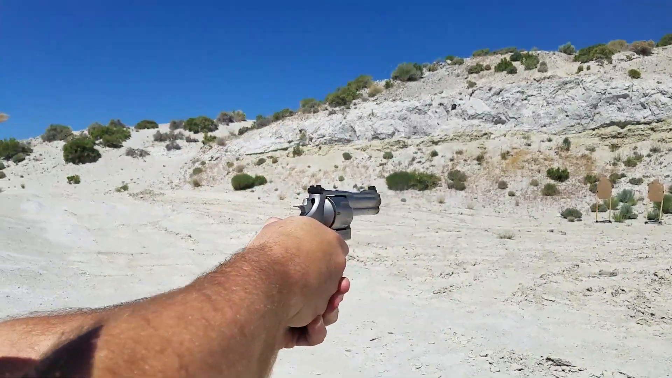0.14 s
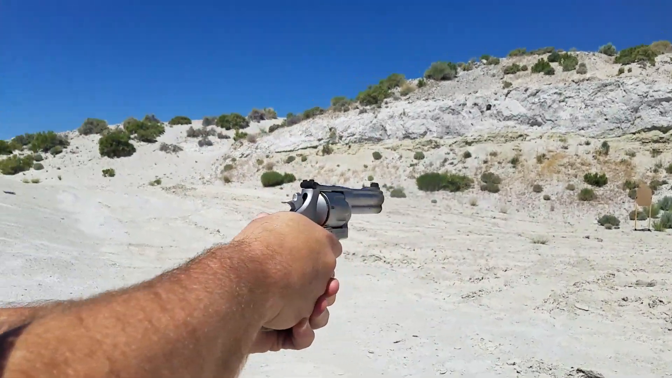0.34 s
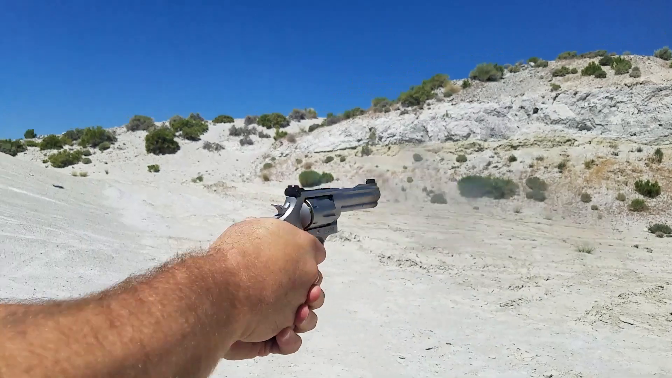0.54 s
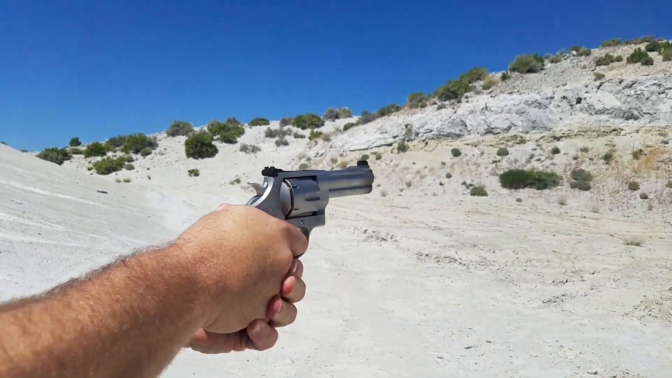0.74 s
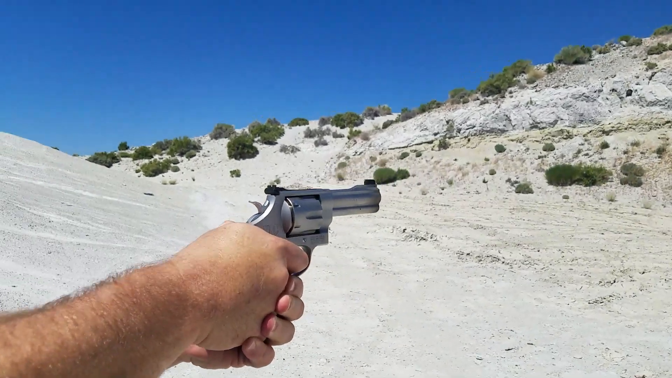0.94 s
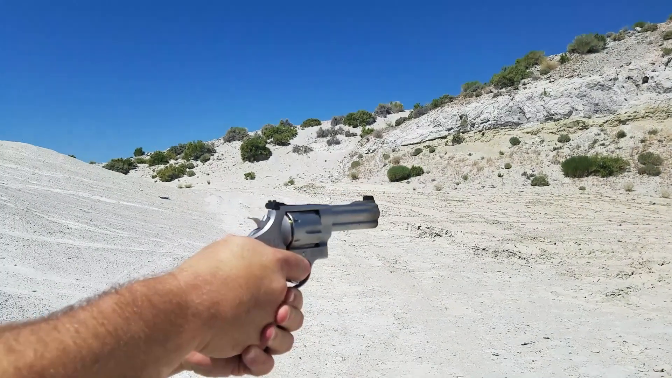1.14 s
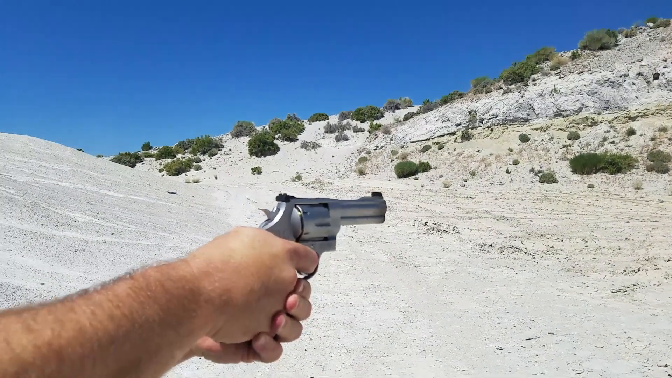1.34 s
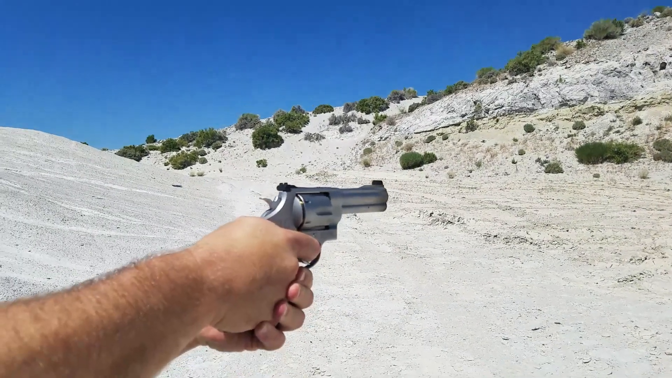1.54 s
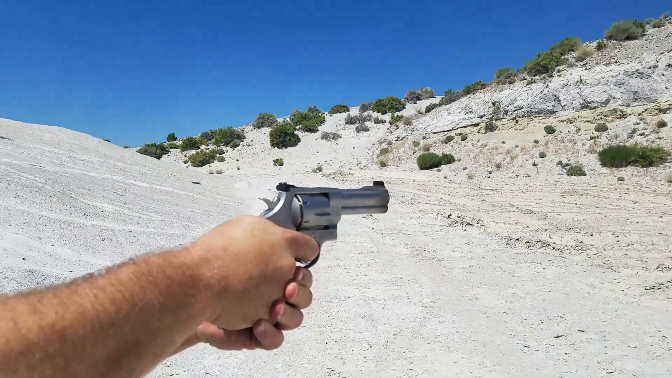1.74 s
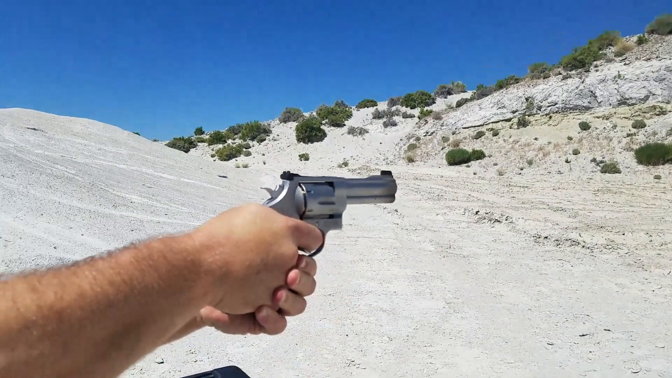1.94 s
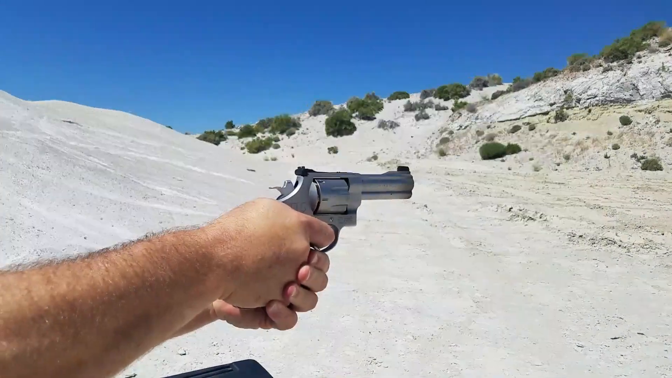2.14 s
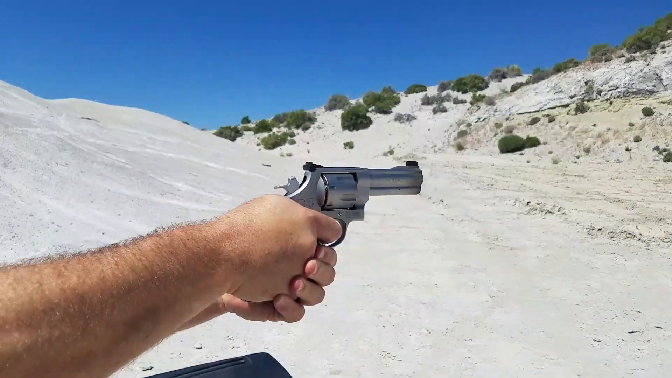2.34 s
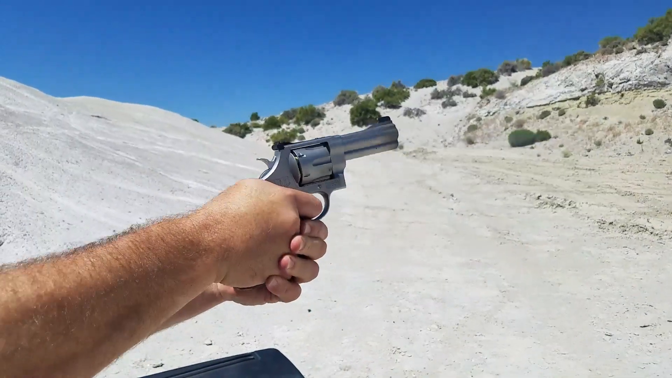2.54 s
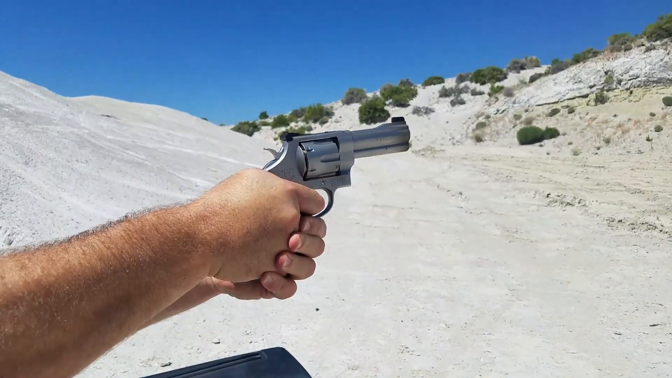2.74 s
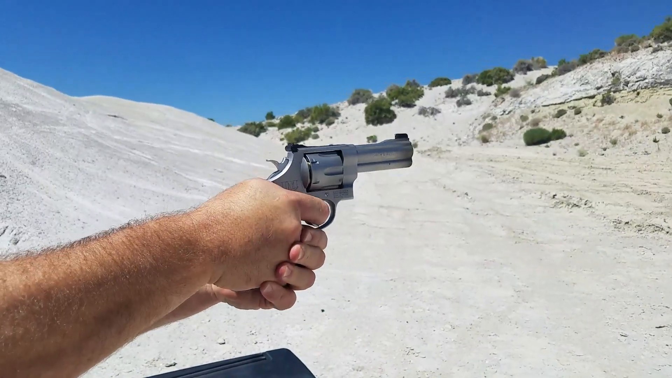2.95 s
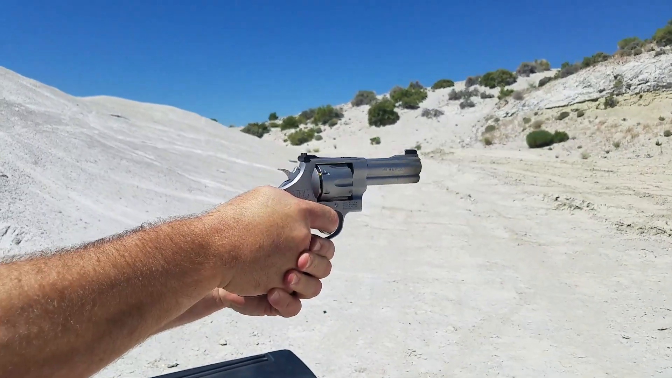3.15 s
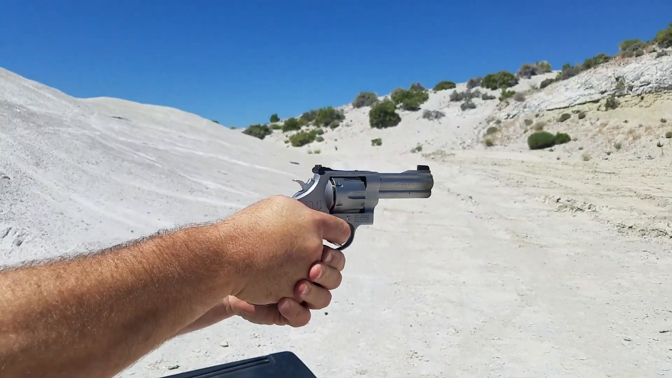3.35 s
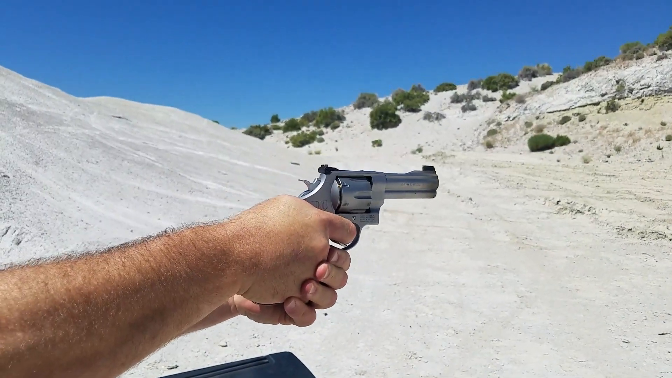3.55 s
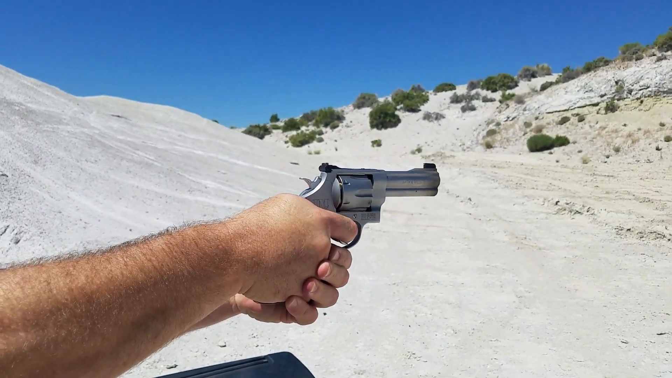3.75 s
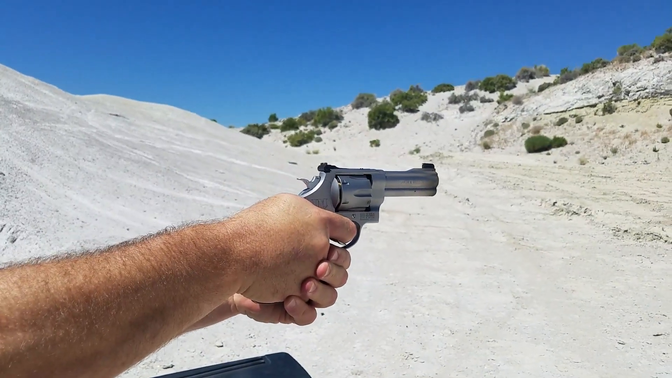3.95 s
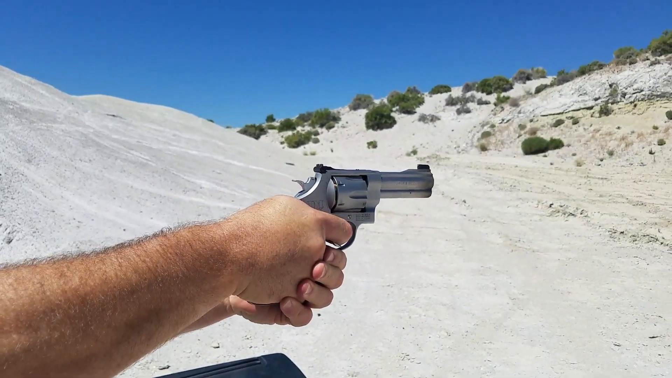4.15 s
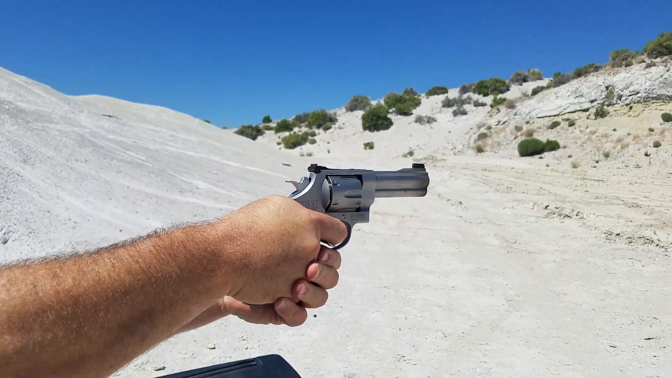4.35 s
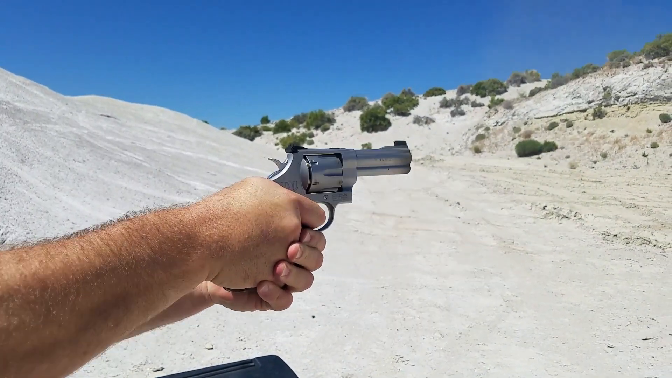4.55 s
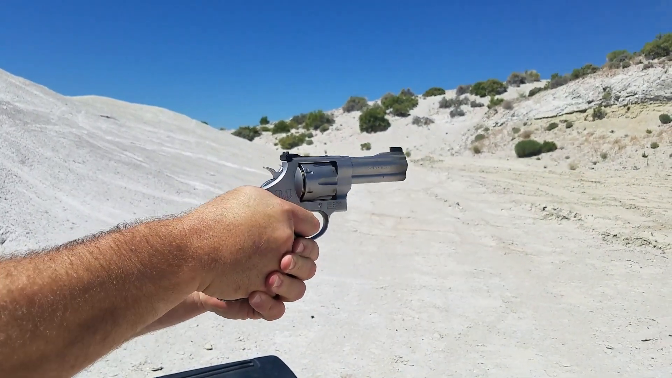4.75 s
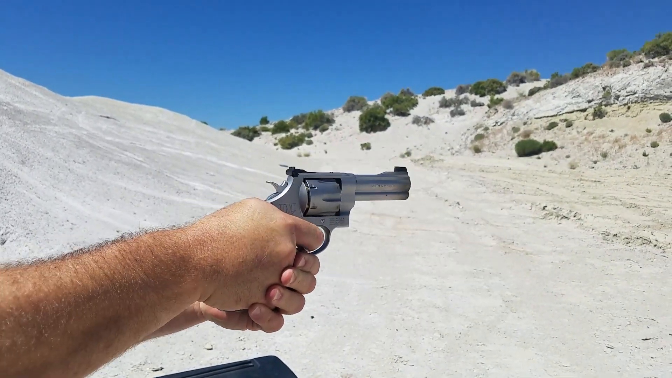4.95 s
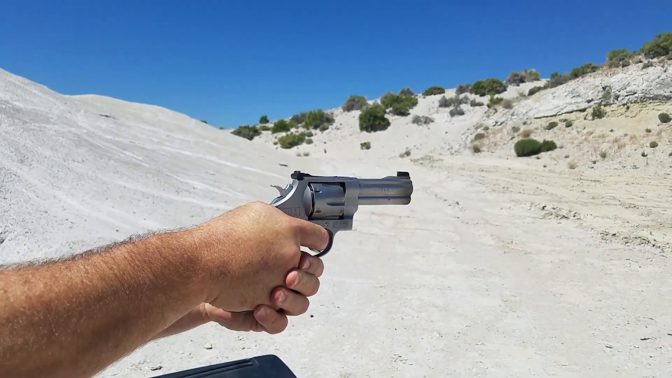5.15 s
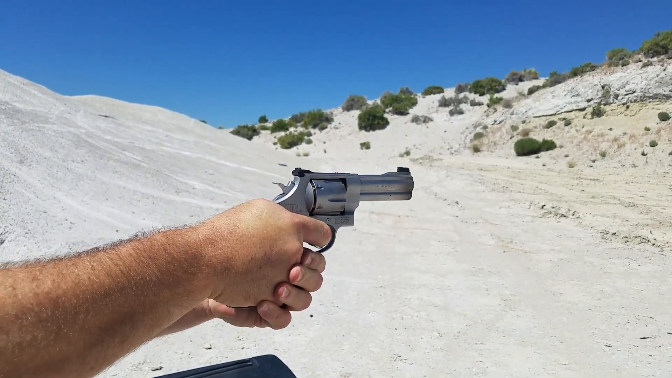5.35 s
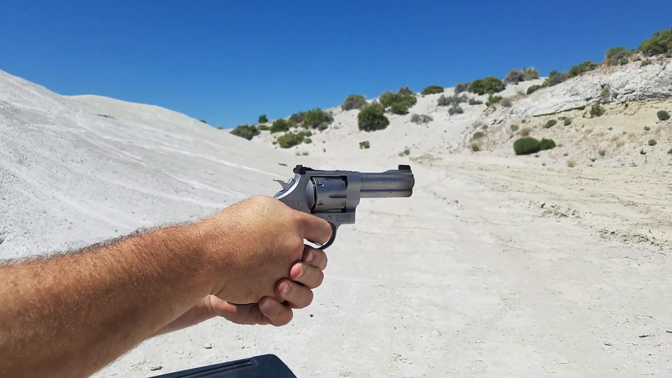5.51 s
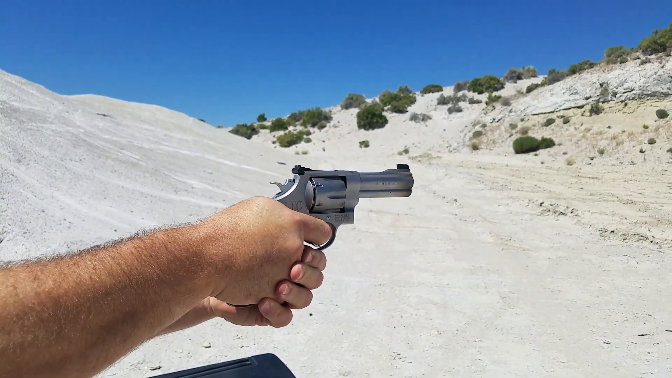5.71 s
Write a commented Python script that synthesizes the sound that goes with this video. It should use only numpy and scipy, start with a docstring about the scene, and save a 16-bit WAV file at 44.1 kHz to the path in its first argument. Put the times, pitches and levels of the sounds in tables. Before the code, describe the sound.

A puff of wind and a click of cocked steel open the scene. A revolver at arm's length fires three times, about two seconds apart, each a harsh clipped crack and roar answered quickly by a slapping hillside echo and fading rumble. Metallic lockwork clicks and faint wind fill the gaps. A small stereo camera close to the gun overloads and ducks.

```python
"""A puff of wind and a click of cocked steel, then three slow revolver shots in a sandy pit, at arm's length.
Blast: shaped noise bursts (crack, roar, late thump, sizzle) plus a wandering sine boom and a ring of steel.
Banks and hillside return smeared noise and sharp slaps; the pit's rumble loses its treble first.
Lockwork: scrapes ringing damped sines. Grip rubs, wind, brush and hiss: noise with moving levels.
A gain control ducks everything after each blast; peaks clip softly in the small camera."""
import sys
import numpy as np
from scipy import signal
from scipy.fft import rfft, irfft, next_fast_len
from scipy.io import wavfile
from scipy.ndimage import minimum_filter1d, map_coordinates

SR = 44100
rng = np.random.default_rng(int(sys.argv[2]) if len(sys.argv) > 2 else 0)


def materialize(psi):
    """Save the field psi as 16-bit PCM at rate SR to the path in sys.argv[1].

    A 1-D psi becomes a single channel; in a 2-D psi each row is a channel.
    """
    bounded = np.clip(np.atleast_2d(psi).T, -1, 1)
    quanta = np.round(bounded * 32767).astype(np.int16)
    wavfile.write(sys.argv[1], SR, quanta)


N = 254898
BASS_HZ = 260  # the ports grow alike below this

# shots: (roar time [s], crack level [dB], ping level [dB], roar level [dB], boom level [dB],
#         sizzle level [dB], delay of the main echo [s], slap level [dB])
SHOTS = [(0.5413, -10.5, -31, 2.5, 3.5, -15, .179, 3), (2.4936, -9.5, -21.5, 3, -5, -14, .1775, 8),
         (4.3992, -12.5, -7, 1.56, -14.5, 4.5, .1866, 2.5)]
# first pressure crack: (frequency [Hz], relative density [dB/Hz])
CRACK_SPECTRUM = [(60, -19.5), (500, -5), (1800, 0.5), (3500, -5), (6000, -10.5), (14000, -13.5),
                  (16000, -13)]
# body of the muzzle blast: (frequency [Hz], relative density [dB/Hz])
ROAR_SPECTRUM = [(25, -40), (100, -27), (215, -8), (265, -14), (335, -4.5), (490, 6), (780, -2.5),
                 (1050, 2), (1300, -3.5), (1700, -3), (2100, -9), (3000, -8.5), (5000, -19.5), (8000, -26),
                 (14500, -24), (16000, -26)]
# late low thump of the overloaded microphone recovering: (frequency [Hz], relative density [dB/Hz])
THUMP_SPECTRUM = [(40, -24), (150, -19.5), (220, 0), (262, -9.5), (335, 1), (430, -10), (900, -34.5),
                  (4000, -70)]
# overload sizzle: (frequency [Hz], relative density [dB/Hz])
SIZZLE_SPECTRUM = [(100, -32.5), (800, -12), (1800, 2.5), (3500, -3), (7000, -9.5), (14000, -3.5),
                   (16000, -5.5)]
CRACK_LEAD_S = .0093
THUMP_DELAY_S, THUMP_DB = 0.01, -16
GROUND_DELAY_S, GROUND_DB = .022, -6.0


def blasts():
    """Crack and ping, roar with boom and sizzle, a low thump as the overloaded microphone recovers, ground."""
    out = np.zeros((2, N))
    for s, crack_db, ping_db, roar_db, boom_db, sizzle_db, *_ in SHOTS:
        crack = burst(CRACK_SPECTRUM, rise_s=0.00028, hold_s=0.00039, t60_s=.038, alike=.4, tilt_db=-0.2)
        roar = burst(ROAR_SPECTRUM, rise_s=0.0017, hold_s=.014, t60_s=.105, alike=0.079, grain_db=1.45)
        thump = burst(THUMP_SPECTRUM, rise_s=.008, hold_s=0.02, t60_s=0.099, alike=0.91)
        sizzle = burst(SIZZLE_SPECTRUM, rise_s=0.00075, hold_s=0.0031, t60_s=.078, alike=.05)
        # ground further out, from the right
        ground = burst(ECHO_SPECTRUM, rise_s=.012, hold_s=0.016, t60_s=.11, alike=1.0,
                       lag_ms=0.3, tilt_db=-3.0)
        add(out, s - CRACK_LEAD_S, amp(crack_db) * crack)
        add(out, s - CRACK_LEAD_S, amp(ping_db) * ping())
        add(out, s, amp(roar_db) * roar)
        add(out, s, amp(boom_db) * boom())
        add(out, s, amp(sizzle_db) * sizzle)
        add(out, s + THUMP_DELAY_S, amp(THUMP_DB) * thump)
        add(out, s + GROUND_DELAY_S, amp(GROUND_DB) * ground)
    return out


# ring of the gun's steel: (frequency [Hz], level [dB], t60 [s])
PING_MODES = [(2030, -1, .032), (3630, 3, 0.014)]


def ping():
    """Short ring of the gun's steel: damped sines, identical at both ports."""
    t = np.arange(SR // 10) / SR
    modes = [amp(db - 60 * t / t60_s) * np.sin(2 * np.pi * hz * t) for hz, db, t60_s in PING_MODES]
    return sum(modes)[None]


BOOM_HZ = 503


def boom():
    """The camera's hollow, struck by the blast: a few strong cycles whose phase walks randomly."""
    t = np.arange(SR // 8) / SR
    shape = np.minimum(t / 0.0014, 1) * amp(-60 * np.maximum(t - .009, 0) / 0.035)
    wander = 0.0097 * np.cumsum(rng.standard_normal(len(t)))
    port_phase = np.array([[0], [.2]])
    return np.sqrt(2) * shape * np.sin(2 * np.pi * BOOM_HZ * t + wander + port_phase)


# spectrum of a sharp slap: (frequency [Hz], relative level [dB])
SLAP_SPECTRUM = [(100, -30.5), (600, 9.5), (2500, 6), (4200, 1.5), (6500, -5), (9000, -8), (16000, -23)]
# flat faces: (time after the main echo [s], level [dB])
FLAT_FACES = [(-.0637, -1.5), (-.0423, 3)]
SLAP_LAG_S, SLAP_LEFT_DB = .0004, -8.5
COMMON_POWER = .8  # share of the slope echo repeated at every shot


def echoes():
    """Rough slopes return dull thuds, much alike for every shot; flat faces keep the shock front sharp."""
    out = np.zeros((2, N))
    terrain = hillside()
    front = -shock(SLAP_SPECTRUM)
    lag = round(SLAP_LAG_S * SR)
    # left port further away and shaded
    slap = np.array([amp(SLAP_LEFT_DB) * np.pad(front, (lag, 0)), np.pad(front, (0, lag))])
    for s, *_, echo_delay, slap_db in SHOTS:
        answer = np.sqrt(COMMON_POWER) * terrain + np.sqrt(1 - COMMON_POWER) * hillside()
        add(out, s + echo_delay - LEAD_S, answer)
        for delay, db in FLAT_FACES:
            add(out, s + echo_delay + delay, amp(slap_db + db) * slap)
    return out


# returning slopes: (time after the main echo [s], level [dB], treble tilt [dB/octave],
#                    centre of the face's colour [Hz], its lift [dB])
SLOPES = [(-.058, -7, -0.5, 960, 2), (-.01, -6.5, -2.5, 200, 6), (-.001, -1.15, -3.5, 660, 5.5),
          (.176, -39, -3.5, 901, 8), (0.271, -47.5, -3.5, 3000, 5), (.44, -54, -1, 530, 9)]
# common colour of the returns: (frequency [Hz], relative density [dB/Hz])
ECHO_SPECTRUM = [(25, -36.5), (100, -23.5), (220, -14.5), (350, -10.5), (450, -2), (530, 2), (660, -2),
                 (800, -7), (1250, -11), (1700, -11.5), (2800, -16.5), (5000, -25), (10000, -36.5),
                 (16000, -36)]
LEAD_S = .1  # room for slopes that precede the main echo
SMEAR_RISE_S, SMEAR_T60_S = .004, .062
RISE_GROWS_S_PER_S, T60_GROWS_S_PER_S = 0.12, 0.74  # per s beyond the main echo
LEDGE_STEP_S, LEDGE_DB, LEDGE_LOSS_DB, LEDGE_TILT_DB_PER_OCT = .014, -11.5, 2.5, -5
SCRUB_S, SCRUB_DB = -0.052, -18.5  # start re main echo, level


def hillside():
    """Slopes, ledges and scrub answer, from LEAD_S before the main echo; later slopes smear more."""
    out = np.zeros((2, SR))
    hz = np.geomspace(25, 16000, 60)
    from_right = dict(hold_s=0.0024, alike=0.61, lag_ms=0.372, grain_db=1.5)
    for delay, db, tilt_db, face_hz, lift_db in SLOPES:
        beyond = max(delay, 0)
        rise_s = SMEAR_RISE_S + RISE_GROWS_S_PER_S * beyond
        t60_s = SMEAR_T60_S + T60_GROWS_S_PER_S * beyond
        lift = lift_db * np.exp(-(np.log2(hz / face_hz) / .5) ** 2)
        face = np.transpose([hz, along(ECHO_SPECTRUM, hz) + lift])
        sound = burst(face, rise_s, t60_s=t60_s, tilt_db=tilt_db, **from_right)
        add(out, LEAD_S + delay - rise_s, amp(db) * sound)
    # ledges behind the main face
    for k in range(1, 4):
        ledge = burst(ECHO_SPECTRUM, SMEAR_RISE_S, t60_s=SMEAR_T60_S, tilt_db=LEDGE_TILT_DB_PER_OCT,
                      **from_right)
        ledge_db = LEDGE_DB - LEDGE_LOSS_DB * (k - 1.5)
        add(out, LEAD_S + k * LEDGE_STEP_S - SMEAR_RISE_S, amp(ledge_db) * ledge)
    # bright scatter off stones and scrub
    scrub = burst(ECHO_SPECTRUM, rise_s=.012, t60_s=.22, tilt_db=1.0, **from_right)
    add(out, LEAD_S + SCRUB_S, amp(SCRUB_DB) * scrub)
    return out


# decay of the pit: (frequency [Hz], t60 [s])
PIT_DECAY = [(60, 1.0), (250, .73), (520, .65), (1000, .62), (3000, .53), (6000, .41), (12000, .33)]


def pit():
    """The pit rumbles on unevenly after each shot, the treble dying first."""
    out = np.zeros((2, N))
    for s, *_ in SHOTS:
        steady = noise(ECHO_SPECTRUM, SR, alike=0.46, lag_ms=0.24, tilt_db=1.53, mono_hz=BASS_HZ)
        hz, t, z = signal.stft(steady, SR, nperseg=256)
        decay = amp(-60 * t / along(PIT_DECAY, hz)[:, None])
        tail = signal.istft(z * decay, SR, nperseg=256)[1]
        add(out, s + .011, amp(-10.5) * tail)
    return out * amp(1.4 * wobble(90))


# cocking and trigger return: (time [s], level [dB], ring [dB], brightness [dB/octave], rebound delay [s])
CLICKS = [(0.0928, -39.5, 0, 2.5, .0015), (1.1016, -38.5, -9, -0.5, .0085), (2.144, -41.5, 3.5, 1, .0015),
          (2.948, -35.5, -1, -0.5, .003), (3.4193, -63.5, 2, -3, .002), (4.996, -36, -2.5, 1, .0025),
          (5.381, -63.5, -4, -4, 0.00205)]
# hammer falls: (time [s], level [dB], ring [dB], brightness [dB/octave])
HAMMER_FALLS = [(0.5226, -33, -16.5, -6), (2.4738, -33.5, -15, -4.5), (4.3723, -36.5, -4, 0.5)]
HAMMER_REBOUND_S = .003  # bounce on the primer
REBOUND_DB, REBOUND_TILT_DB_PER_OCT = -4.5, -2.5
FAINT_RING_S, FAINT_RING_DB = 4.3652, -42  # just before the last hammer fall


def lockwork():
    """Hammer, cylinder and trigger strike home and rebound once; one faint ring."""
    out = np.zeros((2, N))
    falls = [(*fall, HAMMER_REBOUND_S) for fall in HAMMER_FALLS]
    for s, db, ring_db, tilt_db, rebound_s in CLICKS + falls:
        add(out, s, contact(db, ring_db, tilt_db))
        rebound = contact(db + REBOUND_DB, ring_db, tilt_db + REBOUND_TILT_DB_PER_OCT)
        add(out, s + rebound_s, rebound)
    add(out, FAINT_RING_S, amp(FAINT_RING_DB) * ping())
    return out


# modes of the steel frame: (frequency [Hz], level [dB], t60 [s])
FRAME_MODES = [(3150, -8, 0.025), (3370, 0, .016), (5911, -14, 0.013), (8400, -13.5, 0.013),
               (9500, -10.5, 0.015), (12690, -5, .04), (13730, -8.5, .025)]
# steel scraping on steel: (frequency [Hz], relative density [dB/Hz])
SCRAPE_SPECTRUM = [(300, -29.5), (1400, -17.5), (2200, -5), (3200, -2), (5000, -11), (9000, -9.5),
                   (13500, -3), (16000, -6)]


def contact(db, ring_db, tilt_db):
    """One touch of steel on steel: a tiny scrape, the ringing frame and faint ground scatter."""
    t = np.arange(SR // 10) / SR
    out = np.zeros((2, len(t)))
    ring = 0
    for hz, level_db, t60_s in FRAME_MODES:
        strike_db = level_db + rng.normal(0, 1.7, (2, 1)) + tilt_db * np.log2(hz / 6000)
        cycles = hz * t + rng.random((2, 1))
        ring = ring + amp(strike_db - 60 * t / t60_s) * np.sin(2 * np.pi * cycles)
    scrape = burst(SCRAPE_SPECTRUM, rise_s=0.0009, hold_s=0.00025, t60_s=.018, alike=0.78, tilt_db=tilt_db)
    scatter = burst(SCRAPE_SPECTRUM, rise_s=.003, hold_s=.003, t60_s=.065, alike=.2)
    add(out, 0, amp(ring_db) * ring)
    add(out, 0, scrape)
    add(out, .003, amp(-22) * scatter)
    return amp(db) * out


# hand and sleeve: (time [s], level [dB], half length [s])
RUBS = [(0.316, -54.5, 0.024), (1.655, -56, 0.011)]
# soft friction: (frequency [Hz], relative density [dB/Hz])
RUB_SPECTRUM = [(100, -5.5), (650, 9), (1500, 0.5), (4000, -12), (9000, -30), (16000, -29)]


def rubs():
    """Hand and sleeve shift as the grip settles: noise in short, uneven swells."""
    level = sum(amp(db) * swell(s, half_s) for s, db, half_s in RUBS)
    return level * amp(2.5 * wobble(120)) * noise(RUB_SPECTRUM, N, alike=0.32)


# single puffs: (time [s], level [dB], half length [s])
PUFFS = [(0.065, -39.5, 0.0057), (1.72, -59, 0.016), (3.55, -35.5, 0.011), (3.729, -42.5, 0.0059)]
# (frequency [Hz], relative density [dB/Hz])
PUFF_SPECTRUM = [(20, -4), (70, 2.5), (130, -0.5), (300, -14.5), (1000, -59), (4000, -90)]


def puffs():
    """Puffs of air hit the microphone: low noise in short smooth humps."""
    level = sum(amp(db) * swell(s, half_s) for s, db, half_s in PUFFS)
    return level * noise(PUFF_SPECTRUM, N, alike=0.255)


# low swells: gusts, and at .97 s the low rumble lingering after the first shot:
# (peak time [s], level [dB], dying time [s])
LOW_SWELLS = [(.01, -47, 0.14), (.32, -46, 0.13), (.97, -53.5, 0.21), (2.2, -62, 0.18),
              (2.43, -57.5, 0.095), (3.27, -56, 0.018), (3.56, -46.5, 0.18), (4.11, -56.5, .1),
              (5.28, -55, .15), (5.72, -57, 0.056)]
# low noise at the ports: (frequency [Hz], relative density [dB/Hz])
BUFFET_SPECTRUM = [(12, -38.5), (20, -10.5), (65, -0.5), (118, -4), (193, -8.5), (226, -9.5), (406, -14),
                   (800, -34.5), (1040, -65), (1760, -120)]
CALM_DB, FLUTTER_DB = -66, 3.5  # floor between swells, depth of the lumps


def low_swells():
    """Wind gusts and the first shot's lingering rumble: low noise, its lumps independent at each port."""
    swell_power = sum((amp(db) * rise_and_die(s, dying_s)) ** 2 for s, db, dying_s in LOW_SWELLS)
    strength = np.sqrt(amp(CALM_DB) ** 2 + swell_power)
    lumps = amp(FLUTTER_DB * np.array([wobble(30), wobble(30)]))
    return strength * lumps * noise(BUFFET_SPECTRUM, N, alike=0.18)


RISE_RATIO = 0.52  # rise time / dying time


def rise_and_die(s, dying_s):
    """A level that builds quickly up to time s and dies away more slowly."""
    t = np.arange(N) / SR - s
    return np.exp(-np.maximum(t, -t / RISE_RATIO) / dying_s)


# stirring brush: (frequency [Hz], relative density [dB/Hz])
BRUSH_SPECTRUM = [(100, -3.5), (500, 1.5), (1000, 2.5), (2200, -1.5), (4000, -9.5), (7000, -18.5),
                  (16000, -27.5)]
BRUSH_DB, BRUSH_EASES_DB_PER_S = -68, 1.12


def brush():
    """Dry brush stirs unevenly and slowly settles."""
    level_db = BRUSH_DB - BRUSH_EASES_DB_PER_S * np.arange(N) / SR + 0.83 * wobble(26)
    return amp(level_db) * noise(BRUSH_SPECTRUM, N, alike=0.35)


# steady hiss: (frequency [Hz], relative density [dB/Hz])
HISS_SPECTRUM = [(100, 7.5), (1000, 2.5), (4000, 0.5), (6500, -4), (10000, -2.5), (14500, 1.5), (16000, -1)]


def hiss():
    """Faint steady noise, nearly independent at the two ports."""
    return amp(-72.5) * noise(HISS_SPECTRUM, N, alike=0.13)


def amp(db):
    """Decibels to gain."""
    return 10 ** (np.asarray(db) / 20)


def unit(x):
    """x at rms 1."""
    return x / np.sqrt(np.mean(x ** 2) + 1e-20)


def along(points, hz):
    """(Hz, value) points read on a log frequency axis."""
    f, v = np.transpose(points)
    return np.interp(np.log(hz + 1), np.log(f), v)


def colour(points, hz, tilt_db=0):
    """Gain of a spectrum, tilted by tilt_db per octave above 600 Hz."""
    return amp(along(points, hz) + tilt_db * np.log2(np.maximum(hz / 600, 1)))


def add(track, s, sound):
    """Mix a sound into the stereo track at time s."""
    start = max(round(s * SR), 0)
    part = track[:, start:start + sound.shape[1]]
    part += sound[:, :part.shape[1]]


def noise(points, size, alike, lag_ms=0, tilt_db=0, mono_hz=1):
    """Coloured stereo noise of rms 1; the shared part reaches the left port lag_ms later."""
    hz = np.fft.rfftfreq(size, 1 / SR)
    shared, *own = np.exp(2j * np.pi * rng.random((3, len(hz))))
    late = np.exp(-2j * np.pi * hz * lag_ms / 1000)
    # shared power rises to 1 below mono_hz
    share = 1 - (1 - np.clip(alike, 0, 1)) * hz ** 2 / (hz ** 2 + mono_hz ** 2)
    common = np.sqrt(share) * np.array([shared * late, shared])
    separate = np.sqrt(np.abs(1 - share)) * np.array(own)
    return unit(irfft((common + separate) * colour(points, hz, tilt_db), size))


def burst(points, rise_s, hold_s, t60_s, alike, lag_ms=0, tilt_db=0, grain_db=2):
    """Grainy noise that swells, holds and dies away, with the energy of its envelope at each port."""
    t = np.arange(next_fast_len(int((rise_s + hold_s + t60_s) * SR) + 256)) / SR
    shape = np.minimum(t / rise_s, 1) ** 2 * amp(-60 * np.maximum(t - rise_s - hold_s, 0) / t60_s)
    # wavefronts clump a few ms apart
    knots = t * 450
    clumps = amp(grain_db * map_coordinates(rng.standard_normal(int(knots[-1]) + 4), [knots]))
    x = shape * clumps * noise(points, len(t), alike, lag_ms, tilt_db, BASS_HZ)
    return x * np.linalg.norm(shape) / np.linalg.norm(x, axis=1, keepdims=True)


def shock(points):
    """One causal pressure spike of peak 1, its spectrum made minimum-phase by a folded cepstrum."""
    size = 1024
    cepstrum = irfft(np.log(colour(points, np.fft.rfftfreq(size, 1 / SR))))
    spike = irfft(np.exp(rfft(2 * cepstrum[:size // 2], size)))
    return spike / np.abs(spike).max()


def swell(s, half_s):
    """A smooth Gaussian hump in time around s."""
    return np.exp(-.5 * ((np.arange(N) / SR - s) / half_s) ** 2)


def wobble(rate_hz):
    """A smooth random curve, rate_hz knots a second."""
    knots = np.arange(N) * rate_hz / SR
    return map_coordinates(rng.standard_normal(int(knots[-1]) + 4), [knots])


def scene():
    """The gun in front, the slopes a little to the right, over wind, low rumble and hiss."""
    returns = (echoes() + pit()) * amp([[-.7], [.7]])
    background = low_swells() + puffs() + brush() + hiss()
    return blasts() + returns + lockwork() + rubs() + background


DUCK_DB, DUCK_HOLD_S, DUCK_RELEASE_S = 9, .47, .24  # greatest depth, hold, recovery time constant


def gain_control(x, threshold_db=-16):
    """Loud sound turns the gain down at once; it stays down a while and creeps back."""
    level_db = 20 * np.log10(np.abs(x).max(axis=0) + 1e-9)
    over_db = np.clip(level_db - threshold_db, 0, DUCK_DB)
    size = int(DUCK_HOLD_S * SR) | 1
    # running maximum of the past
    held_db = -minimum_filter1d(-over_db, size, origin=size // 2, mode="constant")
    step = 1 / (DUCK_RELEASE_S * SR)
    eased_db = signal.lfilter([step], [1, step - 1], held_db)
    return x * amp(-np.maximum(held_db, eased_db))


TOP_HZ = 15950


def record(dry):
    """Gain control, rounded clipping at full scale and the camera's steep band limit."""
    x = gain_control(dry)
    x = x / (1 + np.abs(x) ** 6) ** (1 / 6)
    size = next_fast_len(N + SR // 2)
    hz = np.fft.rfftfreq(size, 1 / SR)
    low_pass = 1 / np.sqrt(1 + (hz / TOP_HZ) ** 160)
    return irfft(rfft(x, size) * low_pass, size)[:, :N]


dry = scene()
out = record(dry)
materialize(out)
```